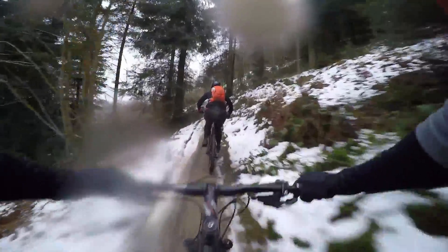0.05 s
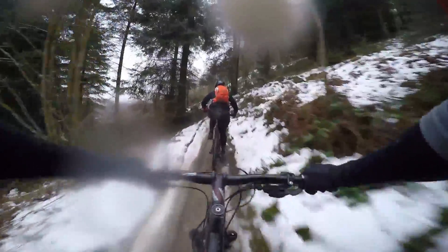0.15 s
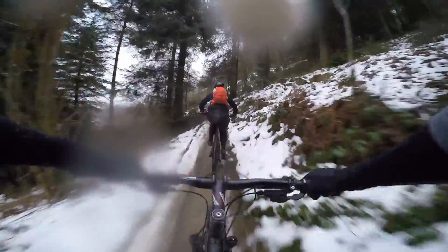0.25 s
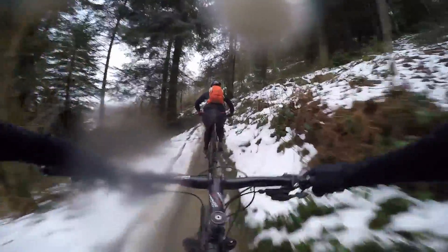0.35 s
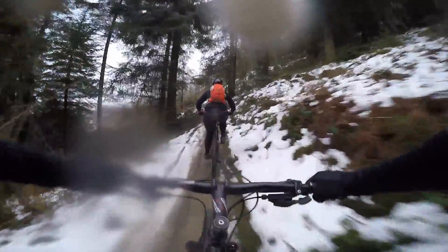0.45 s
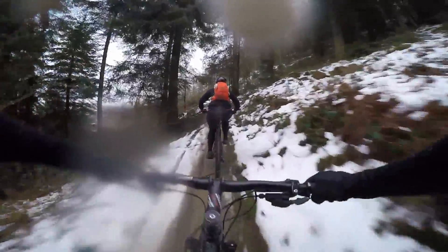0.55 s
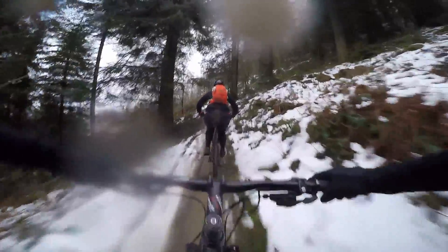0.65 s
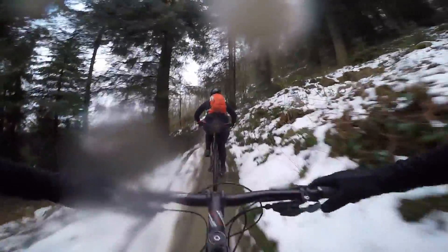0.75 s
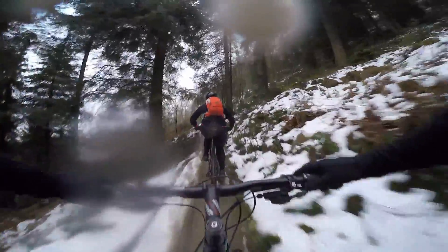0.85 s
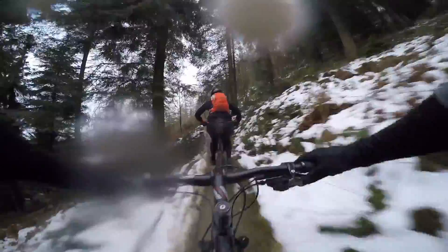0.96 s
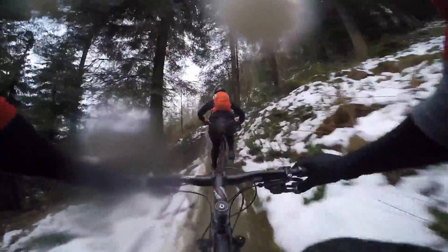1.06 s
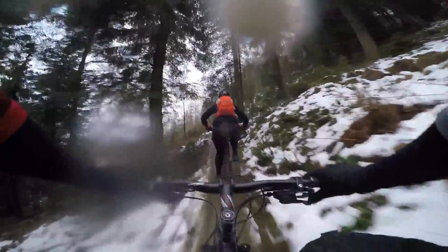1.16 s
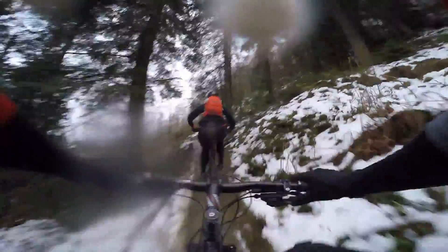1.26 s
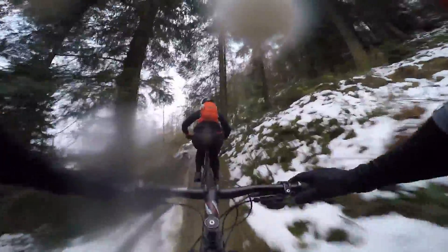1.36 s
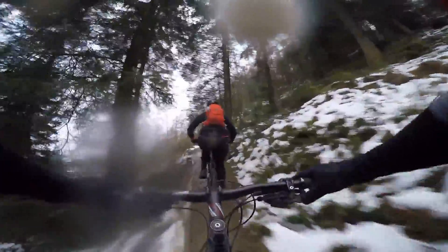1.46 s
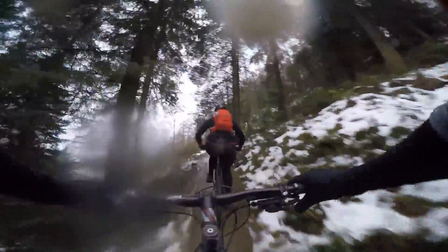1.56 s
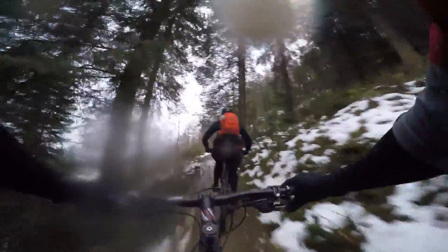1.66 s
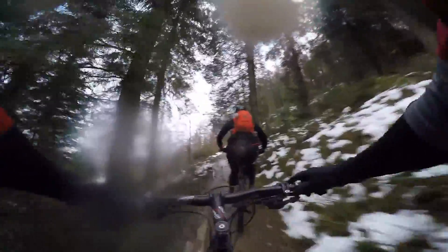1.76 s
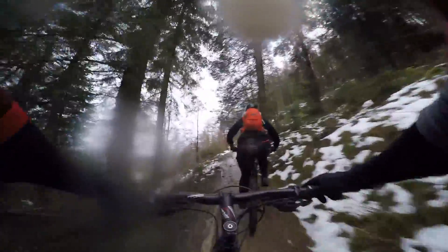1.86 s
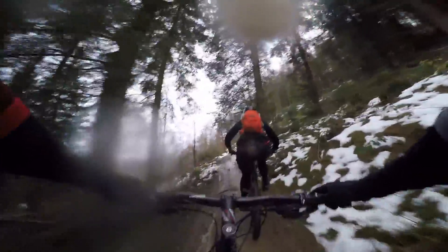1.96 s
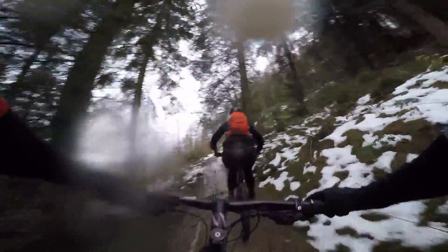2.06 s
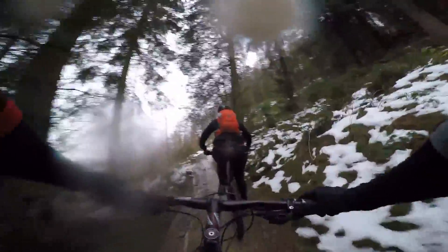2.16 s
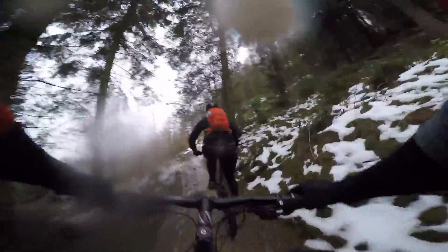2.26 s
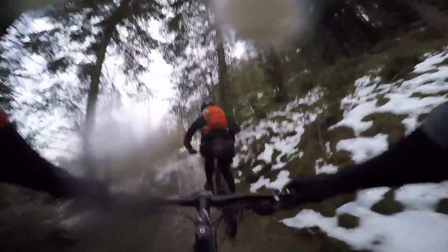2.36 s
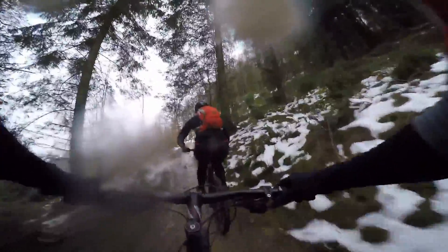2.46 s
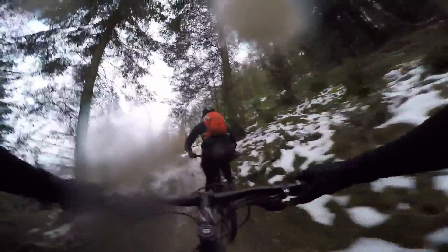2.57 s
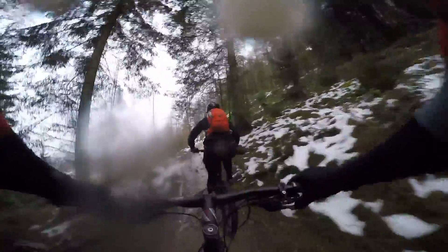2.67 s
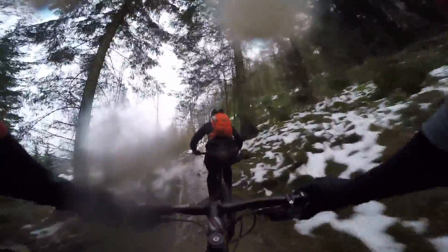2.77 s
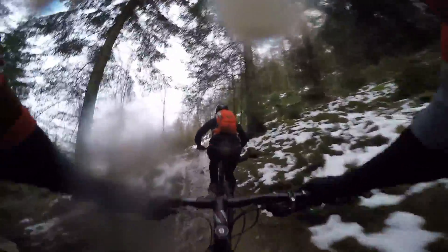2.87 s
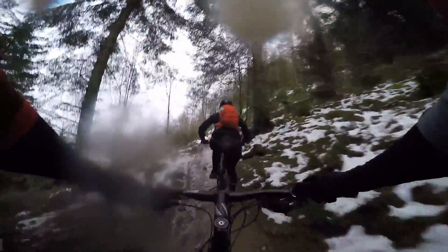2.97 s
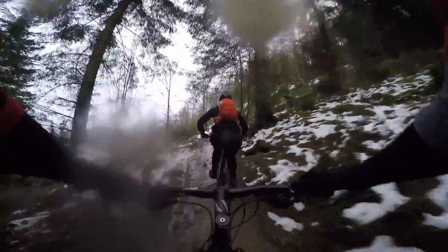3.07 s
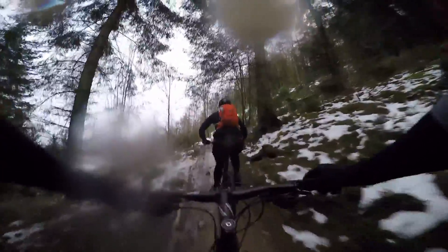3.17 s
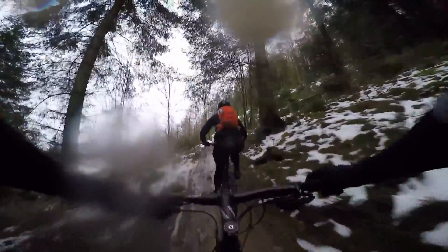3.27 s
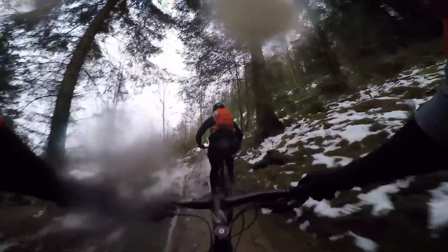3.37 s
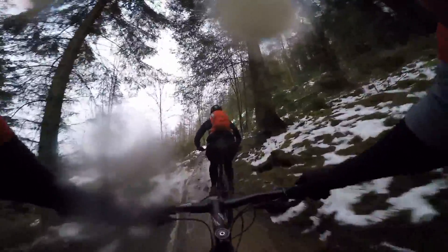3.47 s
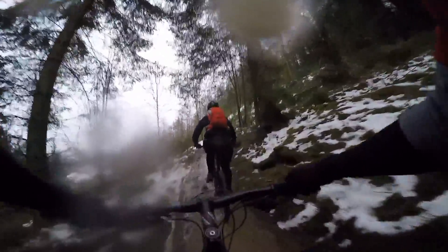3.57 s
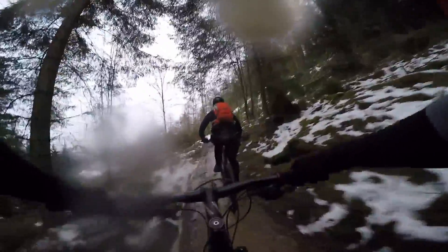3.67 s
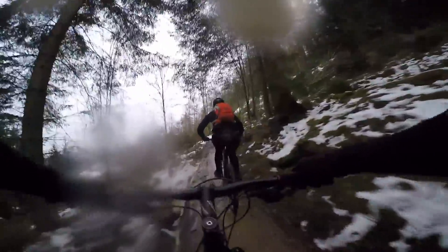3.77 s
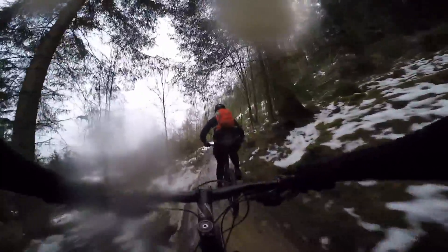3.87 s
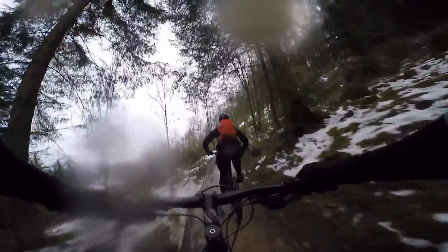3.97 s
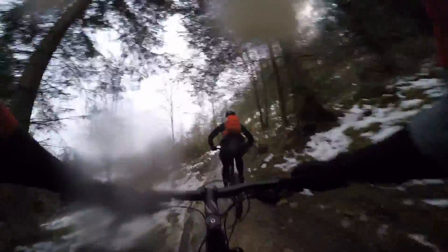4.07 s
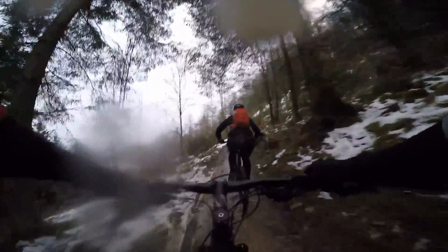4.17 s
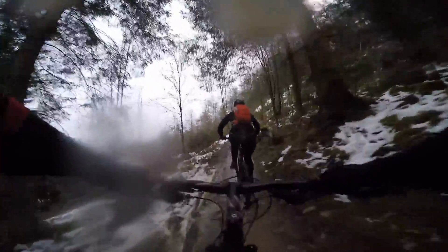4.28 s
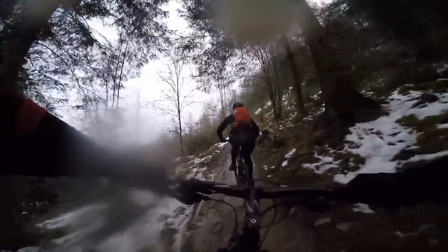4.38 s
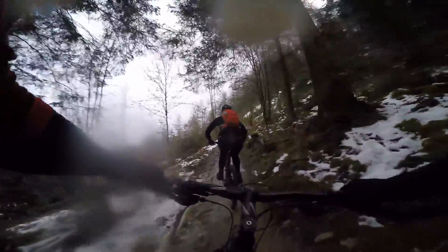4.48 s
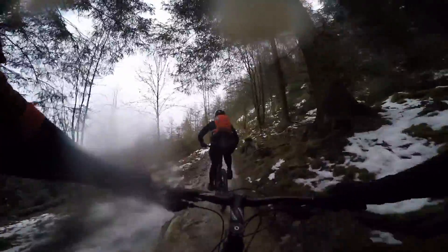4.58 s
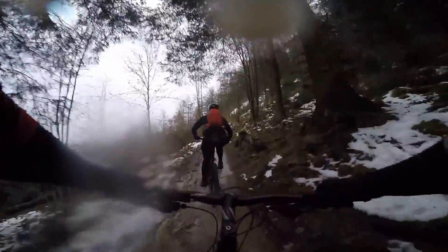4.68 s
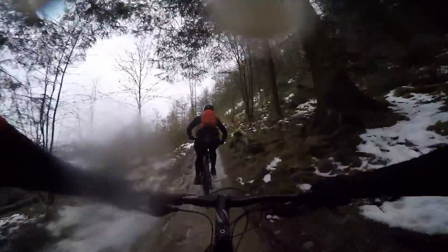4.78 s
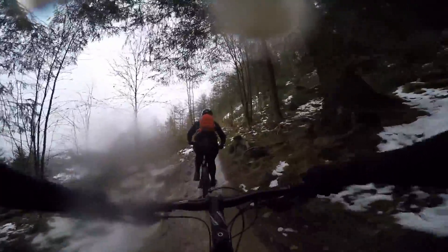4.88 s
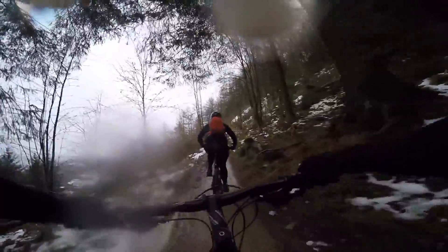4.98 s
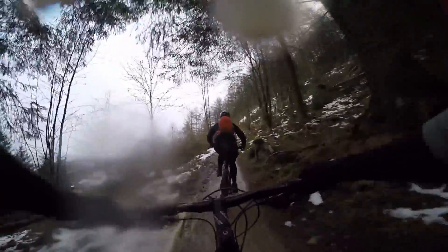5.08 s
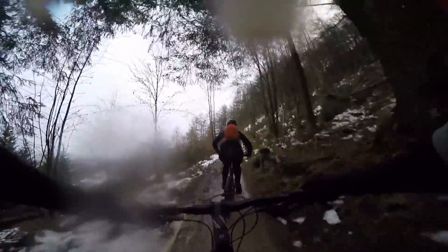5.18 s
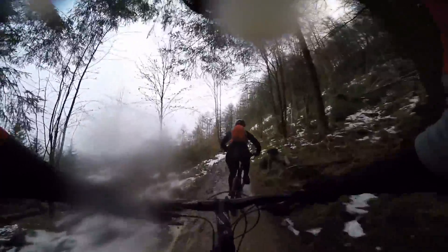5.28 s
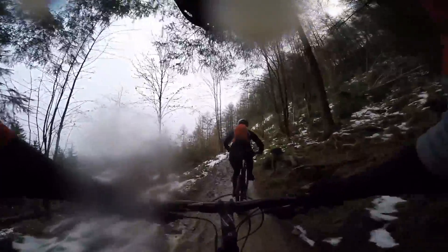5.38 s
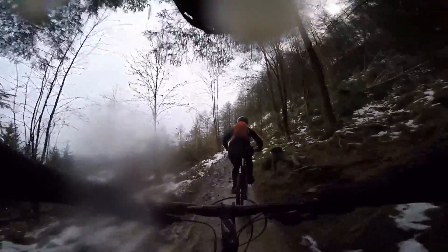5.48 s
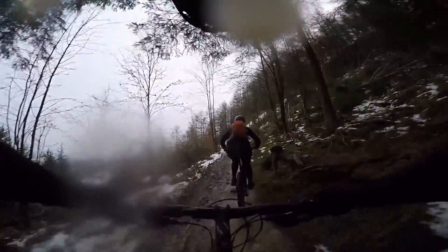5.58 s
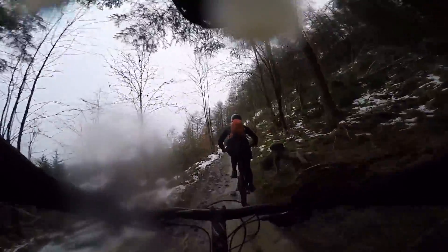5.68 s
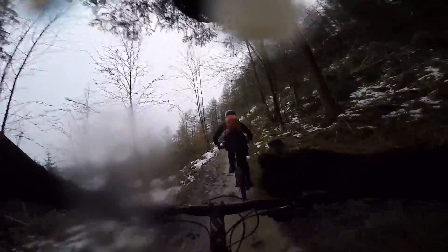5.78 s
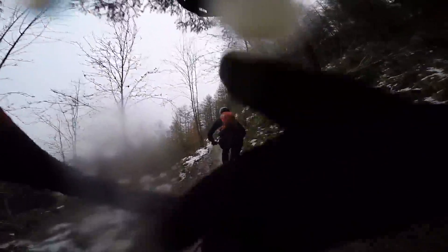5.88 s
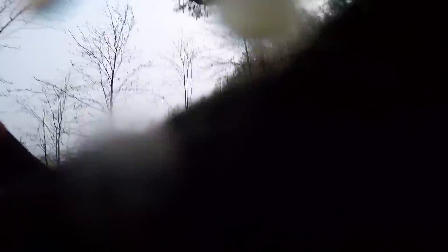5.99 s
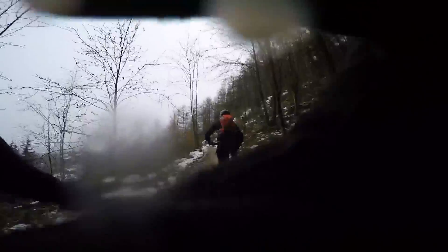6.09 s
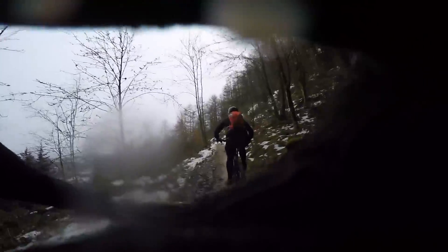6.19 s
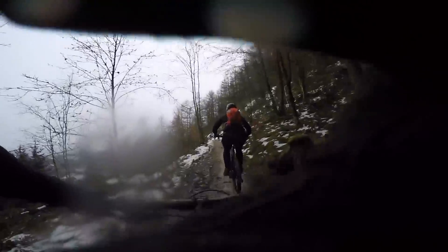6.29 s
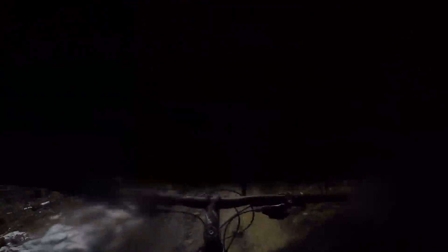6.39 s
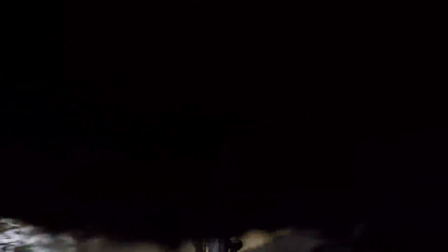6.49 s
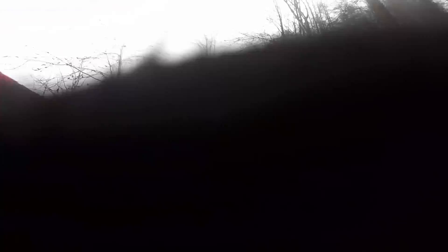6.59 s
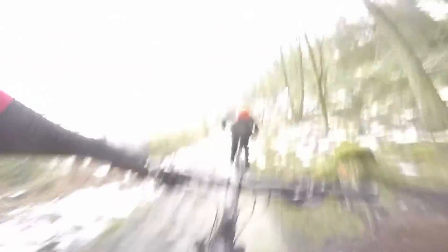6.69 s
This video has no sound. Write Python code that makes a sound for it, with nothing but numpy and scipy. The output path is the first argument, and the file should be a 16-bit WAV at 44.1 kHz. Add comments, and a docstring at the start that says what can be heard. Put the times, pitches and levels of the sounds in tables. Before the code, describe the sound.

A mountain bike fizzes over wet grit and slush, stones ticking, low air thumps at each pedal stroke, then a hand bumps and wipes the camera.

```python
"""On a wet forest trail a mountain bike is pedalled along, heard from a cased camera on the rider's chest.
Tyres fizz through grit and mud: filtered noise and random impacts that surge as slush is squeezed.
Drops and stones tick and ring the case, as short impacts through its resonances.
Low turbulence rumbles, and the air thumps with each pedal stroke as a push and a flurry of eddies.
At the end a glove wipes across the case by stick and slip, pumps the air and knocks the case."""
import sys
import numpy as np
from scipy import signal
from scipy.fft import rfft, irfft, next_fast_len
from scipy.io import wavfile
from scipy.ndimage import uniform_filter1d

SR = 44100
rng = np.random.default_rng(int(sys.argv[2]) if len(sys.argv) > 2 else 0)


def persist_wave(psi):
    """Save psi, clipped to +-1, as 16-bit WAV."""
    counts = np.round(np.clip(psi, -1, 1) * 32767).astype(np.int16)
    wavfile.write(sys.argv[1], SR, np.atleast_2d(counts).T)


N = 297223
TIME = np.arange(N) / SR
LONG = next_fast_len(N, True)
HZ = np.fft.rfftfreq(LONG, 1 / SR)

# resonances of the camera case: [f/Hz, width/Hz, relative level/dB]
CASE_MODES = [(1514, 520, 8.5), (2307, 340, 7.5), (3090, 330, 6.5), (4292, 215, 9), (6030, 83, 6)]
# tyres rolling on the trail: [t/s, grit level/dB, wet spray level/dB]
TYRE_LEVELS = [(0, -46, -63), (.22, -50, -66.5), (.42, -44.5, -56.5), (.65, -48, -63), (.8, -48, -59.5),
               (1.15, -48, -61), (1.6, -44, -57), (1.85, -48.5, -61.5), (2.2, -51, -65), (2.8, -47, -61),
               (3.02, -53.5, -63), (3.6, -51, -63), (4.15, -52.5, -65.5), (4.7, -52, -63),
               (5.4, -52.5, -62), (5.78, -53.5, -64), (5.95, -49.5, -53.5)]
# swishes of the tread through mud and slush, before trims:
# [t/s, level/dB, centre f/Hz, half length/s, spray level against the swish/dB]
MUD_SWISHES = [(0.117, -47, 3020, 0.014, -16), (0.67, -41.5, 2900, 0.03, -10.5),
               (1.055, -40, 2260, 0.023, -30), (1.65, -47, 3100, 0.048, -9), (1.766, -46.5, 1730, .03, -26),
               (1.99, -41, 2500, 0.05, -16), (2.363, -43.5, 2220, 0.052, -18),
               (2.553, -46.5, 5660, 0.015, -11), (2.71, -49, 2250, .022, -7),
               (2.858, -45.5, 3040, 0.022, -6), (3.183, -46, 2370, 0.041, -10),
               (3.522, -43, 2140, 0.024, -17), (3.641, -51.5, 2290, 0.048, -23),
               (3.739, -44.5, 2150, 0.019, -15), (3.943, -51, 3000, 0.1, -9.5),
               (4.294, -41, 2200, 0.029, -14), (4.405, -42, 2270, 0.034, -12),
               (4.573, -45.5, 5500, 0.0088, -22), (4.578, -42, 2070, 0.037, -27),
               (4.633, -41, 2250, 0.0091, -22), (4.733, -45.5, 2240, 0.02, -23),
               (4.892, -48, 2260, 0.028, -20), (5.097, -45, 2980, 0.052, -12)]
# the hand closes over the microphone between these times and then stays
SHIELD_S, SHIELD_DB = (5.98, 6.2), -7


def gain_of(db):
    """Level to amplitude: 20 dB is a factor of ten."""
    return 10 ** (np.asarray(db) / 20)


def evened(x):
    """Normalization of mean power: scales to rms 1."""
    return x / np.sqrt(np.mean(x ** 2) + 1e-20)


def read(points, hz):
    """Spectral envelope: gain at hz from [f/Hz, level/dB] points, interpolated on log frequency."""
    f, db = np.transpose(points)
    return gain_of(np.interp(np.log(hz + 1), np.log(f + 1), db))


def follow(table, axis):
    """Amplitude envelope: one level column of a curve over time as a gain at every sample."""
    rows = np.array(table)
    return gain_of(np.interp(TIME, rows[:, 0], rows[:, axis]))


def add(mix, s, sound):
    """Superposition: adds a sound starting at s seconds, or at zero if s is negative."""
    start = max(round(s * SR), 0)
    part = mix[start:][:len(sound)]
    part += sound[:len(part)]


def causal(gain):
    """Minimum phase: the impulse response of a gain curve, with a sharp start and ringing after."""
    log_gain = np.log(np.maximum(gain, 1e-5))
    circle = np.concatenate([log_gain, log_gain[-2:0:-1]])
    # the phase is the Hilbert transform of the log gain
    return np.fft.ifft(np.exp(np.conj(signal.hilbert(circle)))).real


def bins(size=4096):
    """Discrete spectrum: the frequencies in Hz on which filters are drawn."""
    return np.fft.rfftfreq(size, 1 / SR)


def case(ring):
    """Modal response: power resonances of the case, scaled by ring, stand on a flat response."""
    power = 1
    for hz, width, db in CASE_MODES:
        power = power + (ring * gain_of(db)) ** 2 / (1 + (2 * (bins() - hz) / width) ** 2)
    return np.sqrt(power)


def coloured(x, gain):
    """Linear filtering: convolves with a causal response and scales to rms 1."""
    return evened(signal.oaconvolve(x, causal(gain))[:N])


def wander(hz):
    """Low-pass noise: slow random variation up to about hz, of rms 1."""
    spectrum = rfft(rng.standard_normal(LONG)) / (1 + (HZ / hz) ** 4)
    return evened(irfft(spectrum, LONG)[:N])


def grains(per_s, spread_db, hiss):
    """Shot noise: sparse random impacts of very unequal size over a bed of white noise."""
    size = gain_of(spread_db * np.minimum(rng.exponential(1, N), 4))
    struck = rng.random(N) < per_s / SR
    clicks = size * rng.choice([-1, 1], N) * struck
    return evened(clicks) + hiss * rng.standard_normal(N)


def swell(s, half_s):
    """Gaussian envelope: a smooth bump that peaks at s."""
    return np.exp(-np.minimum(((TIME - s) / half_s) ** 2, 50))


def puff(hz, half_s):
    """Pressure pulse, .2 s long: it dips quickly, overshoots and settles in slower swings."""
    t = np.arange(-SR // 10, SR // 10) / SR
    lag = t * (1 - 0.25 * np.tanh(t / half_s))  # time runs faster before the middle than after
    return np.sqrt(2) * np.sin(2 * np.pi * hz * lag) * np.exp(-(lag / half_s) ** 2)


def eddies(spectrum, steady_s):
    """Turbulence: shaped noise whose power is evened over spans longer than steady_s."""
    x = evened(irfft(rfft(rng.standard_normal(LONG)) * read(spectrum, HZ), LONG))
    span = max(int(steady_s * SR), 1)
    power = abs(signal.hilbert(x)) ** 2 / 2
    power = uniform_filter1d(uniform_filter1d(power, span), span)
    return (x / np.sqrt(power))[:N]


def wind(lull_db=1, swing_db=-1, swing_hz=46, swing_s=0.021, buffet_db=-4, buffet_s=0.027,
         rebound_db=-14, rebound_s=0.171):
    """Turbulent pressure: rumble lulls between strokes; each adds a push, eddies and a weaker rebound."""
    # air on the microphone, before the lulls: [t/s, rumble level/dB]
    air_levels = [(0, -20), (.6, -25), (.9, -27), (1.55, -24.5), (1.95, -29), (2.2, -25.5), (2.55, -28),
                  (3.2, -27), (3.7, -30), (4.1, -24), (4.75, -30.5), (5.35, -32), (5.8, -35), (6.05, -18.5),
                  (6.29, -28.5), (6.74, -20.5)]
    # spectrum of the steady rumble: [f/Hz, relative level/dB]
    rumble_spectrum = [(5, -22), (14, 4), (24, -0.5), (34, -2), (48, -10), (80, -21.5), (160, -37.5),
                       (400, -73)]
    # spectrum of the stroke's eddies: [f/Hz, relative level/dB]
    buffet_spectrum = [(15, -2.5), (34, -6), (55, 11.5), (75, -0.5), (100, -6), (150, -18), (250, -38),
                       (500, -68), (1500, -87)]
    # the rider's body swings into the air at each pedal stroke, in an even cadence
    first_stroke_s, stroke_s, stroke_count = .1356, .3417, 17
    stroke_db, ease_db_per_s = -20.5, -0.32

    pedalling = np.cos(2 * np.pi * (TIME - first_stroke_s) / stroke_s) * (TIME < SHIELD_S[0])
    rumble = follow(air_levels, axis=1) * eddies(rumble_spectrum, steady_s=0.039)
    out = gain_of(lull_db * pedalling) * rumble
    flurry = np.zeros(N)
    uneven = rng.uniform(.85, 1.15, stroke_count)  # varies the pitch of the pushes, not their timing
    for k, speed in enumerate(uneven):
        s = first_stroke_s + k * stroke_s
        db = stroke_db + ease_db_per_s * s
        add(out, s - .1, gain_of(db + swing_db) * puff(swing_hz * speed, swing_s))
        rebound = gain_of(rebound_db) * swell(s + rebound_s, buffet_s)
        flurry += gain_of(db + buffet_db) * (swell(s, buffet_s) + rebound)
    return out + flurry * eddies(buffet_spectrum, steady_s=0.027)


def shoves():
    """Near-field air displacement: the hand pumps air at the microphone and jolts the mount."""
    # presses of the hand: [t/s, level/dB, swing f/Hz, half length/s, rumple level against the swing/dB]
    presses = [(5.993, -9.5, 54, 0.0051, -31), (6.049, -1, 43, 0.012, -17), (6.117, -14.5, 22, 0.019, -21),
               (6.414, -29, 49, 0.057, -7.5), (6.559, -16.5, 29.5, 0.017, -19),
               (6.672, -19, 90, 0.021, -2.5), (6.726, -3.5, 50, 0.015, -11)]
    rumple_spectrum = [(20, -39), (75, 9.5), (115, 4.5), (180, -10.5), (300, -16), (450, -18), (1200, -33.5)]
    rumple = eddies(rumple_spectrum, steady_s=0.037)
    out = np.zeros(N)
    for s, db, hz, half_s, rumple_db in presses:
        add(out, s - .1, gain_of(db) * puff(hz, half_s))
        out += gain_of(db + rumple_db) * swell(s, 1.36 * half_s) * rumple
    return out


def glove(catch_db=1.4, bright_hz=5000, curve=1.065):
    """Stick-slip friction: wet fibres catch and slip on the case, each wipe with its own brightness."""
    # wipes that build up and let go: [t/s at the height, level/dB, rise/s, release/s, treble change/dB]
    glove_wipes = [(5.985, -29, .0015, 0.024, 11.5), (6.018, -23, 0.014, 0.0074, 18.5),
                   (6.049, -9.5, 0.0059, 0.0079, -14), (6.116, -20, 0.023, 0.021, 1.5),
                   (6.364, -25, 0.025, 0.0095, 4), (6.441, -33, 0.079, 0.017, 4),
                   (6.62, -29, 0.1, 0.099, 4), (6.67, -24.5, 0.019, 0.032, 1),
                   (6.719, -13, 0.017, 0.021, 6)]
    # spectrum of cloth on the case: [f/Hz, relative level/dB]
    cloth_spectrum = [(150, -23), (250, -11), (635, -21), (717, -9), (995, -14), (1530, -3.5), (2240, -1.5),
                      (2950, 1), (3630, -8.5), (4240, -5.5), (4790, -15.5), (6540, -13.5), (8620, -23),
                      (10600, -22), (15500, -34)]
    slips = gain_of(catch_db * wander(hz=159)) * grains(per_s=3600, spread_db=3.5, hiss=1.0)
    rub = coloured(slips, read(cloth_spectrum, bins()) * case(ring=0.46))
    high_pass = signal.butter(2, bright_hz, "high", fs=SR, output="sos")
    treble = signal.sosfiltfilt(high_pass, rub)
    out = np.zeros(N)
    for s, db, rise_s, release_s, bright_db in glove_wipes:
        away = np.minimum(np.maximum((s - TIME) / rise_s, (TIME - s) / release_s), 20)
        wipe = rub + (gain_of(bright_db) - 1) * treble
        out += gain_of(db) * np.exp(-away ** curve) * wipe
    return out


def rings(waver=0.014):
    """Damped free vibration: metal parts ring on after blows, wavering in pitch as they rattle."""
    # ringing parts: [t/s, mean f/Hz, level/dB, time to fall by 60 dB/s]
    metal_parts = [(1.73, 1600, -34.5, .14), (1.759, 1514, -35.5, .24), (2.562, 1540, -39, .17),
                   (2.561, 1620, -35, .088), (6.160, 1875, -29, .19)]
    out, t = np.zeros(N), np.arange(SR // 3) / SR
    for s, hz, db, t60 in metal_parts:
        shake = evened(uniform_filter1d(rng.standard_normal(len(t)), size=300))
        turns = np.cumsum(hz * (1 + waver * shake)) / SR
        add(out, s, gain_of(db - 60 * t / t60) * np.sin(2 * np.pi * turns))
    return out


def patter(level_db=-15.5, per_s=16, tick_db=-17, ticks_per_s=14):
    """Impulse excitation: mud specks each wake a lower resonance of the case; finer drops click brightly."""
    speck_spectrum = [(400, -6), (1400, -4.0), (16000, -8)]
    drop_spectrum = [(300, -2), (2500, -2), (6500, -8), (15000, -21.5)]
    specks = np.zeros(N)
    for hz, width, db in CASE_MODES[:-1]:
        ring = 1 / np.sqrt(1 + ((bins() - hz) / width) ** 2)
        impacts = grains(per_s=per_s, spread_db=3.5, hiss=0)
        specks += gain_of(db) * coloured(impacts, ring * read(speck_spectrum, bins()))
    drops = coloured(grains(per_s=ticks_per_s, spread_db=4, hiss=0), read(drop_spectrum, bins()))
    ticks = gain_of(level_db) * evened(specks) + gain_of(tick_db) * drops
    return follow(TYRE_LEVELS, axis=1) * ticks


def blows(rows, strike, crush_s, scatter_s, scatter_db, octaves):
    """Impact response: a sharp contact, a brief crush and a scatter of debris ring through the case."""
    out, f, t = np.zeros(N), bins(), np.arange(SR // 16) / SR
    knock = causal(read([(60, 6.5), (190, 5), (400, -1.5), (800, -2), (1500, -7), (3500, -62)], f))
    splash = causal(read([(2500, -29), (5800, 9), (8000, 1.5), (12000, -5.5), (16000, -16)], f))
    shell_spectrum = [(400, -34.5), (1400, 4.5), (4500, 3.5), (7000, -0.5), (15000, -13.0)]
    shell = case(ring=6.1) * read(shell_spectrum, f)
    crush = np.exp(-t / crush_s) + gain_of(scatter_db) * np.exp(-t / scatter_s)
    for s, db, hz, low_db, high_db in rows:
        ring = causal(shell / np.sqrt(1 + (np.log2((f + 1) / hz) / octaves * 2) ** 2))
        contact = crush * rng.standard_normal(len(t))
        contact[0] += strike
        for response, part_db in (ring, 0), (knock, low_db), (splash, high_db):
            blow = signal.fftconvolve(contact, response)
            # the level is that of the blow's energy spread over 10 ms
            blow *= np.sqrt(SR / 100) / np.linalg.norm(blow)
            add(out, s, gain_of(db + part_db) * blow)
    return out


def hits():
    """Contact duration: stones and wet clods burst and scatter; the hand's knocks are short and dry."""
    # both tables: [t/s, ring level/dB, ring centre f/Hz, low knock and bright splash against the ring/dB]
    # the loudest stones, drops and rattles
    stone_rows = [(0.079, -36, 3400, -27, -13.5), (0.103, -36.5, 3400, -34, -13), (0.125, -49, 900, 2, -30),
                  (0.318, -42, 2350, -1, -22), (0.4111, -29.5, 3530, -25, -15.5),
                  (0.551, -37, 4450, -30, -9), (0.6272, -38.5, 2140, -18, -21),
                  (0.7322, -34.5, 4130, -34, -16), (0.801, -31, 4300, -44, -11),
                  (0.8884, -39.5, 2970, -26, -23), (0.9009, -35.5, 2300, -8.5, -19),
                  (0.952, -32.5, 4300, -40, -10), (1.0381, -41, 2280, -6, -3),
                  (1.0675, -34, 4200, -20, -12.5), (1.0858, -47.5, 2240, -13, 5),
                  (1.2487, -37, 3220, -41, -12), (1.2913, -43.5, 2800, 0, -14),
                  (1.3281, -38, 2040, -24, -9.5), (1.5318, -43.5, 1800, -17, -1.5),
                  (1.551, -39, 2300, -15, -33), (1.582, -42, 3240, -31, -2), (1.6565, -35, 4200, -36, -13),
                  (1.7291, -29, 3200, -16, -20), (1.7572, -31, 3070, -33, -16.5),
                  (1.8747, -31, 1720, -8.5, -25), (1.9134, -39, 3100, -14, -28),
                  (1.9663, -39.5, 1710, -11, -11.5), (2.0133, -26.5, 1910, -17, -20),
                  (2.0755, -37, 2290, -8, -25), (2.187, -40, 2050, -12, -32),
                  (2.2796, -38.5, 3700, -22, -16), (2.3728, -34.5, 2850, -11, -22),
                  (2.5566, -29.5, 2770, -19.5, -33), (2.635, -57, 2430, -5, -18),
                  (2.6763, -35.5, 4370, -37, -10), (2.6915, -46, 2250, -29, -1),
                  (2.7113, -36.5, 2420, -11, -30), (2.729, -37.5, 2190, -20, -5.5),
                  (2.8536, -40.5, 3520, -33, -15), (3.0147, -41, 1570, -4.5, -21),
                  (3.044, -32.5, 4370, -38, -11.5), (3.1612, -29, 2290, -14, -22),
                  (3.226, -32.5, 4000, -20, -15.5), (3.249, -56, 950, 6, -30),
                  (3.3657, -38.5, 2840, -5, -33), (3.4895, -55, 2190, 5, -24),
                  (3.6576, -43.5, 2660, -5.5, -15), (4.0618, -33.5, 4410, -33, -12.5),
                  (4.095, -40, 2150, -5, -37), (4.2303, -44, 2580, -3, -25), (4.3063, -36, 3080, -16, -12),
                  (4.3882, -35, 2070, -7, -15), (4.4221, -26, 2920, -5.5, -14.5),
                  (5.26, -52, 2410, -7, -21), (5.348, -52, 1440, -2, -8), (5.8535, -47, 2340, -3.5, -14),
                  (5.907, -40, 2490, -33, -23)]
    # hard, dry knocks of the hand on the camera
    knock_rows = [(6.033, -29.5, 1500, 1, -10), (6.0475, -11.5, 2400, -12, -11.5),
                  (6.061, -25, 1700, -7, -27), (6.0826, -30, 2200, -28, -6), (6.158, -8, 2370, -20, -7.5),
                  (6.2076, -33, 2340, -21, -13), (6.217, -32, 2380, -17, -21), (6.2247, -35, 6000, -14, 2)]
    stones = blows(stone_rows, strike=3, crush_s=.0021, scatter_s=.012, scatter_db=-23, octaves=.4)
    knocks = blows(knock_rows, strike=1.95, crush_s=0.001, scatter_s=0.0087, scatter_db=-26, octaves=0.4)
    return stones + knocks


def swishes(level_db=-1, width_hz=600):
    """Band-pass noise: squeezed slush fizzes in one band for a moment."""
    out, t = np.zeros(N), np.arange(-SR // 4, SR // 4) / SR
    for s, db, hz, half_s, _ in MUD_SWISHES:
        band = signal.lfilter(*signal.iirpeak(hz, hz / width_hz, SR), rng.standard_normal(len(t)))
        band = signal.lfilter(*signal.iirpeak(hz, 1, SR), band)
        fizz = np.exp(-(t / half_s) ** 2) * evened(band)
        # no fizz peaks earlier than .25 s, the middle of its span
        add(out, s + t[0], gain_of(db + level_db) * fizz)
    return out


def tyres(thud_db=-14, clump_db=2.0, dig_db=-6, ground_db=1):
    """Granular excitation: grit crunches, water hisses, lumps thud in the frame; swishes make them surge."""
    # spectrum of grit under the tread: [f/Hz, relative level/dB]
    grit_spectrum = [(180, -30), (300, -9), (410, -10), (656, -10), (715, -8.5), (1140, -13.5),
                     (1650, -6.5), (1830, -8), (3010, -3), (3670, -11), (4290, -8.5), (5320, -41.5),
                     (7590, -24.5), (9000, -27.5), (11700, -38.5), (19800, -120)]
    # spectrum of water off the tread: [f/Hz, relative level/dB]
    spray_spectrum = [(2500, -6), (4200, 2), (6300, 2), (8500, -7), (10000, -5), (12000, -12),
                      (14500, -11.5), (16000, -18)]
    clumps = gain_of(clump_db * wander(hz=54.0))
    crunch = clumps * grains(per_s=460, spread_db=11.5, hiss=1.97)
    grit = coloured(crunch, read(grit_spectrum, bins()) * case(ring=0.84))
    spray = coloured(clumps * rng.standard_normal(N), read(spray_spectrum, bins()))
    frame = read([(60, -17), (230, 8), (450, -5.5), (800, -9.5), (1500, -7.5), (4000, -65)], bins())
    thuds = coloured(grains(per_s=45, spread_db=7.0, hiss=0.64), frame)
    ground = gain_of(ground_db * wander(hz=6.3))
    rolling = ground * follow(TYRE_LEVELS, axis=1)
    wet = ground * follow(TYRE_LEVELS, axis=2)
    for s, db, _, half_s, wet_db in MUD_SWISHES:
        surge = gain_of(db) * swell(s, half_s)
        # powers add
        rolling = np.hypot(rolling, gain_of(dig_db) * surge)
        wet = np.hypot(wet, gain_of(wet_db) * surge)
    return rolling * (grit + gain_of(thud_db) * thuds) + wet * spray


def scene():
    """Superposition at one microphone; the hand shields it from tyres and patter at the end."""
    shield = gain_of(np.interp(TIME, SHIELD_S, [0, SHIELD_DB]))
    trail = shield * (tyres() + patter()) + swishes() + hits() + rings()
    hand = glove() + shoves()
    return (wind() + trail + hand)[None]


def record(dry):
    """Saturation and band limiting: peaks round off near full scale, then a low-pass at edge_hz."""
    edge_hz = 15750
    rounded = dry / (1 + dry ** 6) ** (1 / 6)
    low_pass = signal.firwin(255, edge_hz, window=("kaiser", 9), fs=SR)
    return signal.oaconvolve(rounded, low_pass[None], "same")


dry = scene()
out = record(dry)
persist_wave(out)
```